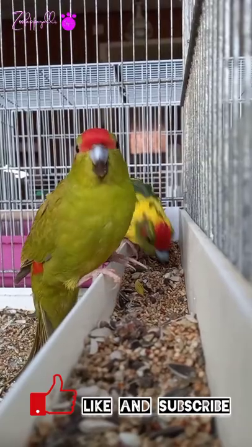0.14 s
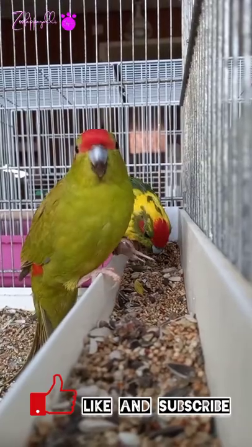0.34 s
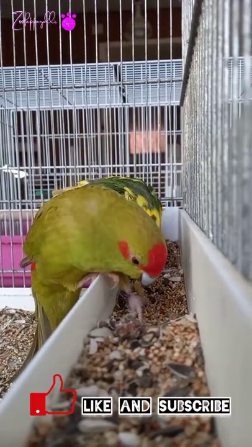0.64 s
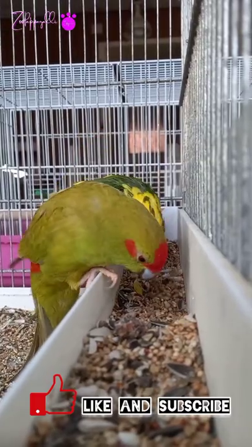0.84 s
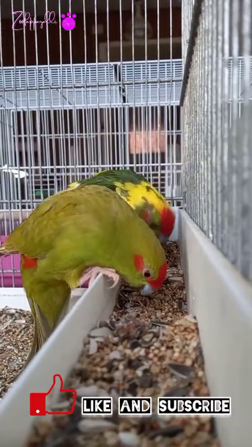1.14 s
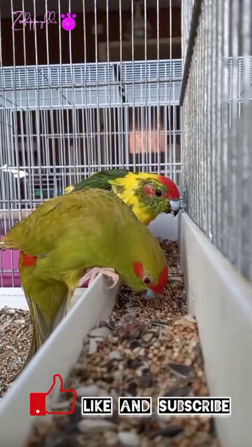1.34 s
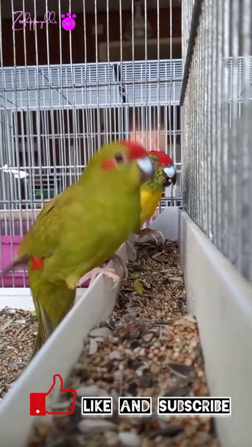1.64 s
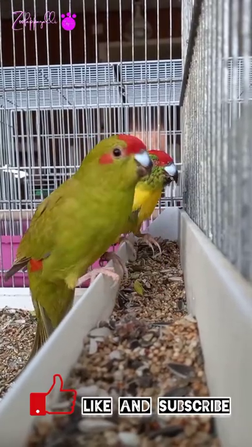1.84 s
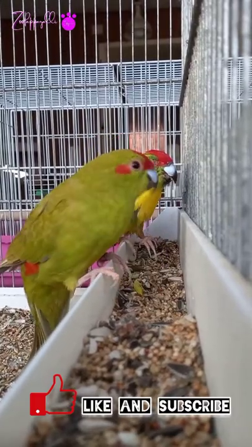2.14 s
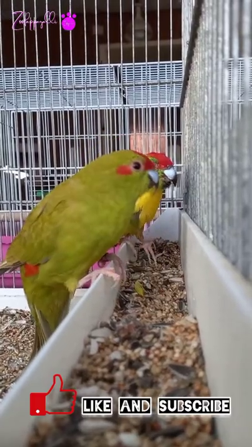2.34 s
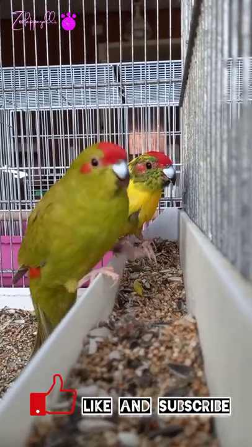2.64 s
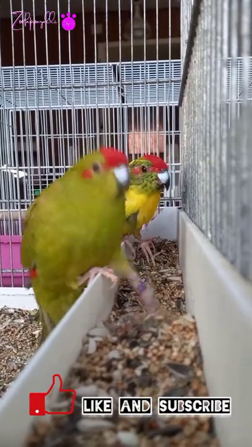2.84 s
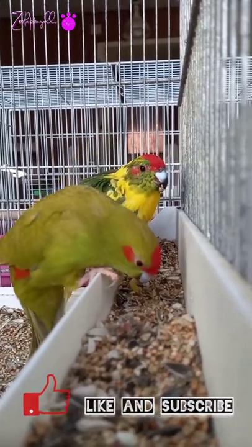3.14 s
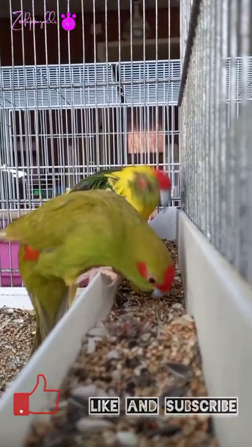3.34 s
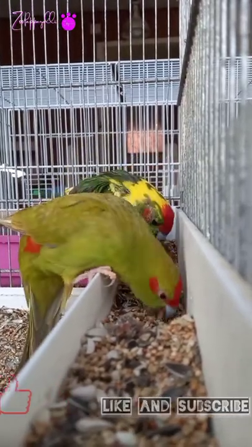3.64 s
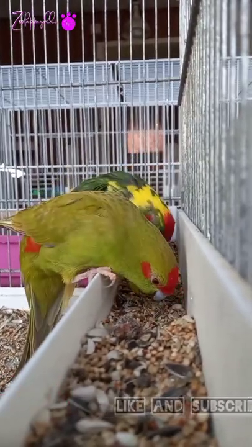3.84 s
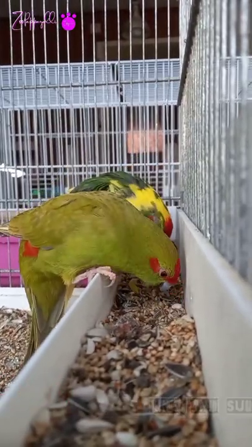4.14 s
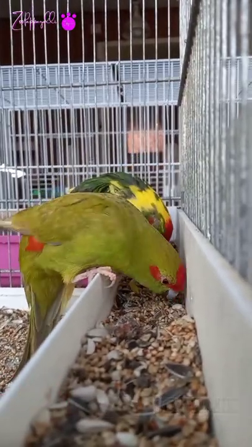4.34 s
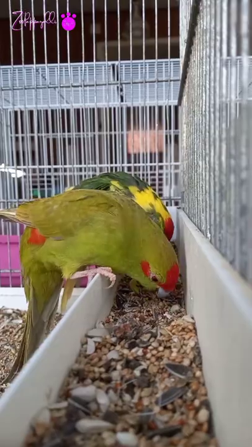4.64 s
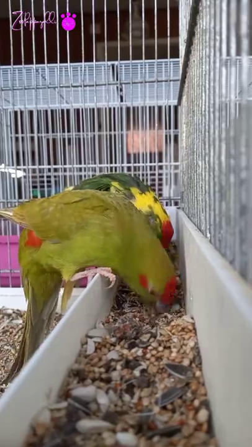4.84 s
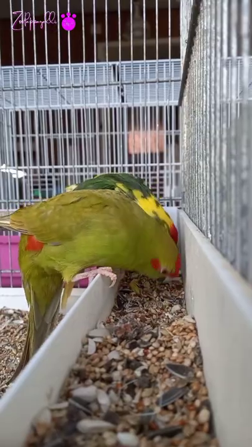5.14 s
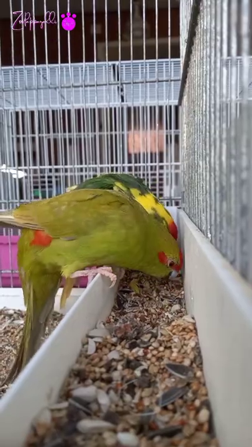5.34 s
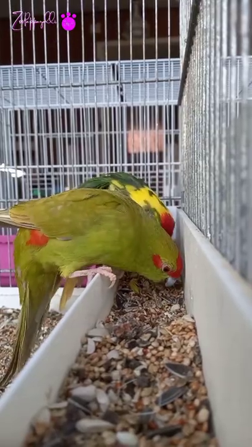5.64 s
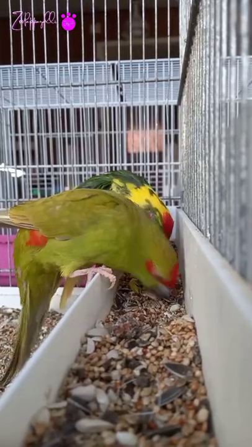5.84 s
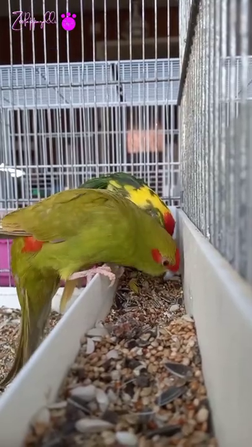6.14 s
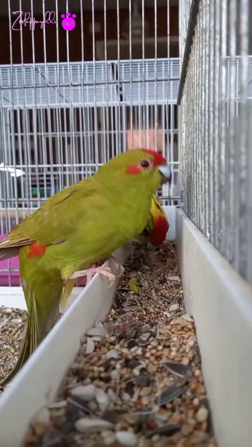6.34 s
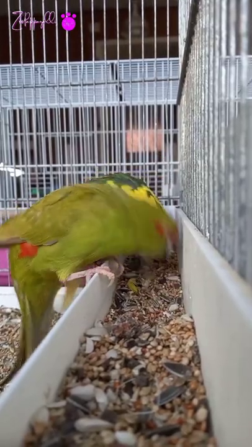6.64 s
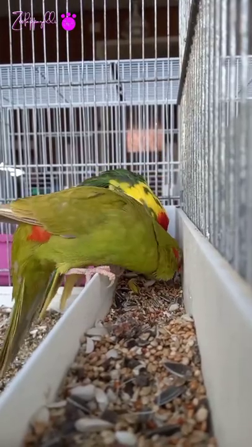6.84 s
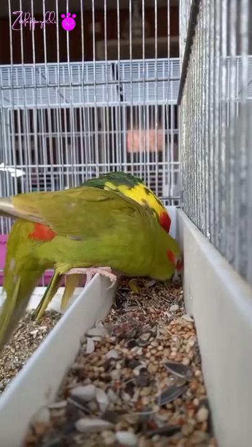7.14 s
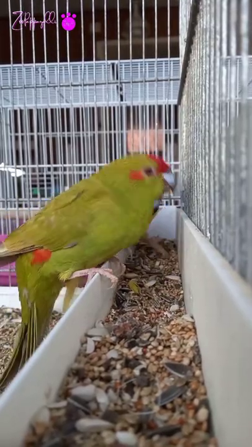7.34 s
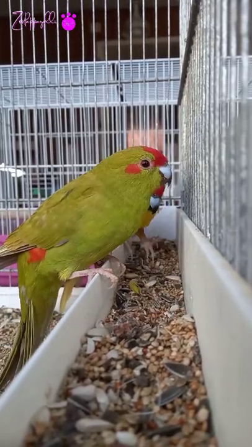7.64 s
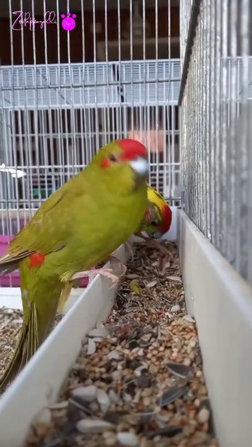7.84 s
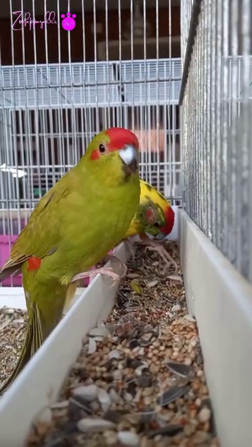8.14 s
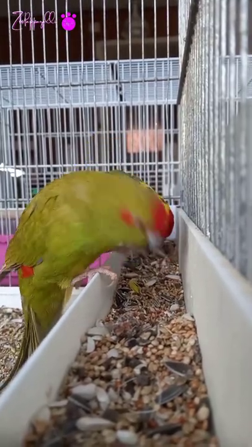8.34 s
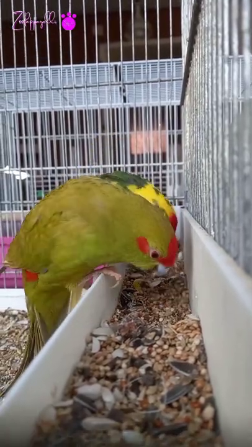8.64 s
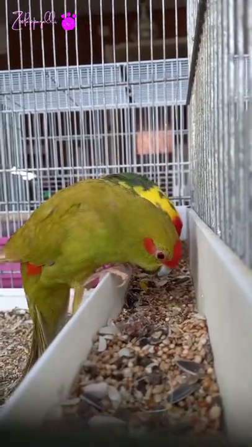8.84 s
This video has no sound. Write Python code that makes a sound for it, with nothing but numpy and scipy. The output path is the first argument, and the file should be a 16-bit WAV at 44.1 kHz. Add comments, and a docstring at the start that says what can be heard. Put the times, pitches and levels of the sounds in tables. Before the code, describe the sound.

Two parakeets feed at a plastic seed tray, heard very close in stereo, over quiet steady air and faint low cage rumble. Light ticks and rustles open, then a cluster of dry husk cracks at 0.7-0.95 seconds and digging, scraping seed at 1.3-1.5. At 1.5 a startlingly loud squawk, about a fifth of a second, swoops up, leaps to a high whistle, drops to a lower note and breaks into rasp, with a dull tray thump and short bright reverberation. After a lull, crisp cracks crowd together at 2.8-3.0. From 3.2 to 6.5 gentle swishes and sparse crackle continue, with tiny peeps near 5.7 and 6.7 and snaps at 6.7. A second, similar squawk bursts out at 7.2 with another thump. The feeding calms from 7.7; a scrape at 8.2, a strong crack at 8.64 and faint peeps close it.

```python
"""Beaks crack husks and stir seed in a plastic tray close by, over a faint cage rumble and steady air.
Two loud squawks leap into a high whistle, drop to a lower register and end in a rasp; a few peeps are soft.
The seed sounds and rumble are filtered noise: sparse grains, snaps with a decaying ring, or steady noise.
The two parakeets' calls are harmonics and pulsed noise shaped by a throat; a small hard-walled aviary rings on."""
import sys
import numpy as np
from scipy import signal
from scipy.fft import rfft, irfft
from scipy.io import wavfile

SR = 44100
rng = np.random.default_rng(int(sys.argv[2]) if len(sys.argv) > 2 else 0)


def master(y):
    """Save y as 16-bit WAV."""
    cut = np.clip(np.atleast_2d(y).T, -1, 1)
    pcm = np.round(cut * 32767)  # scale
    wavfile.write(sys.argv[1], SR, pcm.astype(np.int16))


N = 396900
T = np.arange(N) / SR

# spectrum of a breaking husk: f/Hz, level/dB
HUSK_SPECTRUM = [(300, -41), (800, -22), (1400, -4), (2400, 1), (4000, 0.5), (6400, 9), (7800, -13),
                 (11500, -1.5), (16000, -14.5)]


def undb(db):
    """Level and amplitude: 20 dB is a factor of ten in gain."""
    return 10 ** (np.asarray(db) / 20)


def unit(x):
    """Normalisation of mean power: scale to rms 1."""
    return x / np.sqrt(np.mean(x ** 2) + 1e-20)


def on_log_axis(hz, points):
    """Logarithmic frequency scale: interpolate (f/Hz, value) points, held constant beyond the ends."""
    f, value = np.transpose(points)
    return np.interp(np.log(np.maximum(hz, 1)), np.log(f), value)


def colour(x, spectrum):
    """Minimum-phase filtering by a (f/Hz, level/dB) spectrum: causal, so that attacks stay sharp."""
    n = x.shape[-1]
    gain = undb(on_log_axis(np.fft.rfftfreq(n, 1 / SR), spectrum))
    cepstrum = irfft(np.log(gain), n)
    # folding the cepstrum onto positive time gives the minimum phase
    cepstrum[1:n // 2] *= 2
    cepstrum[n // 2 + 1:] = 0
    return irfft(rfft(x) * np.exp(rfft(cepstrum)), n)


def wander(t, rate):
    """Slow random modulation: normal random levels, rate a second, joined by lines."""
    place = (t - t[0]) * rate
    knots = rng.standard_normal(int(place[-1]) + 2)
    return np.interp(place, np.arange(len(knots)), knots)


def spread(three, shared):
    """Interchannel coherence: two channels from three signals, the first one common to both."""
    shared = np.clip(shared, 0, 1)
    return np.sqrt(shared) * three[0] + np.sqrt(1 - shared) * three[1:]


def add(out, start, x):
    """Superposition: mix x into out at a time in seconds."""
    i = max(int(start * SR), 0)
    out[..., i:i + x.shape[-1]] += x[..., :max(N - i, 0)]


def gestures(rows, rise_db_per_s, fade_db_per_s):
    """Exponential growth and decay with powers summed: gain for rows of t/s, hold/s, level/dB."""
    t, power = T[::64], 0  # a coarse time grid is enough
    for s, hold_s, db in rows:
        before, after = np.maximum(s - t, 0), np.maximum(t - s - hold_s, 0)
        below = rise_db_per_s * before + fade_db_per_s * after
        power = power + undb(db - below) ** 2
    return np.interp(T, t, np.sqrt(power))


def busy():
    """Activity as a slow envelope: gain near 1 while the birds feed, fading when they look up."""
    # bouts with heads down in the tray: t/s, length/s
    bouts = [(0, 1.75), (2.3, 5.44), (8.601, 0.35)]
    return gestures([(s, length_s, 0) for s, length_s in bouts], rise_db_per_s=200, fade_db_per_s=60)


def grains(rate, scatter_db, spectrum):
    """Shot noise: countless tiny contacts of uneven size at random moments, rate a second; rms 1."""
    size = undb(scatter_db * np.minimum(rng.exponential(size=N), 5))
    impacts = size * (rng.random(N) < rate / SR)
    return unit(colour(spread(impacts * rng.standard_normal((3, N)), 0.041), spectrum))


def feeding(bed_crackle_db, bed_swish_db, bed_hiss_db, dig_hiss_db, dig_swish_db, sweep_crackle_db, ticks_db):
    """Granular friction: stirred seeds crackle; husks and feathers swish and hiss; nibbling ticks faintly."""
    # spectra of seed crackle, soft swish and fine hiss: f/Hz, level/dB
    seed_spectrum = [(400, -23), (900, -9), (1700, -3), (2400, 4), (3200, -5), (5000, -4), (6600, -5.5),
                     (7700, -12.5), (11500, -10), (16000, -11)]
    swish_spectrum = [(150, -6), (400, -12), (620, -8.5), (850, 0.5), (1080, 3), (1450, -10.5),
                      (2200, -24.5), (4000, -32.5)]
    hiss_spectrum = [(3000, -21), (5200, -12.5), (6400, 1), (6850, -6), (7400, -21), (9500, -16),
                     (11000, -19), (13000, -12.5), (16000, -16.5)]
    # a beak sweeps loose husks aside: t/s, hold/s, swish level/dB before the swish gain, hiss level/dB
    sweeps = [(0.174, 0.022, -84, -67.5), (0.457, .06, -85, -77), (.735, 0.017, -62, -46.5),
              (0.92, 0.014, -73, -62), (1.079, 0.079, -71, -68.5), (1.29, 0.2, -59, -51.5),
              (2.24, .08, -90, -72.5), (2.47, .04, -68, -67), (2.67, .03, -67, -66),
              (2.87, 0.095, -64, -52), (3.332, .04, -78, -67), (3.48, .14, -83, -73.5),
              (3.69, .07, -72, -72), (3.867, .12, -76.5, -72.5), (4.18, .03, -60.5, -59),
              (4.45, .06, -83.5, -72.5), (4.74, .05, -66, -62), (4.88, 0.019, -64, -65.5),
              (5.091, .04, -59, -57.5), (5.20, .06, -64.5, -66.5), (5.36, .13, -70, -71.5),
              (5.74, 0.019, -72.5, -60), (6.044, .02, -60.5, -57), (6.25, .02, -59.5, -55),
              (6.35, .03, -61.5, -64.5), (6.558, .04, -71.5, -71.5), (6.72, 0.016, -70.5, -55.5),
              (6.909, 0.018, -92, -76), (7.08, .11, -74, -59), (8.191, 0.042, -80, -67.5),
              (8.64, 0.0082, -68.5, -60)]
    # a beak or foot digs into the seed: t/s, hold/s, crackle level/dB
    digs = [(.62, 0.0086, -68), (.726, 0.051, -50), (1.33, .08, -53.5), (1.42, 0.13, -52),
            (2.87, 0.054, -52.5), (3.87, 0.0092, -70), (3.98, 0.0096, -67.5), (5.74, .02, -68),
            (6.72, .02, -72), (7.06, .06, -66.5), (7.18, .02, -54.5), (8.66, 0.027, -57.5),
            (8.80, 0.022, -66.5)]
    s, hold_s, swish_db, hiss_db = np.transpose(sweeps)
    bed = busy()
    dig = gestures(digs, rise_db_per_s=900, fade_db_per_s=170)
    sweep = gestures(zip(s, hold_s, swish_db), rise_db_per_s=323, fade_db_per_s=125.5)
    slide = gestures(zip(s, hold_s, hiss_db), rise_db_per_s=450, fade_db_per_s=160)
    # hypot adds the powers of independent movements
    crackle_gain = np.hypot(dig, bed * undb(bed_crackle_db) + sweep * undb(sweep_crackle_db))
    swish_gain = np.hypot(sweep, dig * undb(dig_swish_db) + bed * undb(bed_swish_db))
    hiss_gain = np.hypot(slide, dig * undb(dig_hiss_db) + bed * undb(bed_hiss_db))
    crackle = grains(7200, 3.0, seed_spectrum) * crackle_gain
    swish = grains(6000, 1.5, swish_spectrum) * undb(2.5) * swish_gain
    hiss = grains(9000, 1.9, hiss_spectrum) * hiss_gain
    ticks = grains(40, 3.0, HUSK_SPECTRUM) * bed * undb(ticks_db)
    return crackle + swish + hiss + ticks


def background(rest_db, feeding_db, air_db):
    """Broadband excitation: the cage rumbles as the birds peck and shift their weight, over steady air."""
    # spectra of the cage rumble and the air: f/Hz, level/dB
    cage_spectrum = [(20, -16), (45, -19.5), (78, 4), (115, -8.5), (200, -15), (400, -17), (800, -26.5),
                     (2000, -50)]
    air_spectrum = [(18, -36.5), (30, -10), (88, 3.5), (152, -7.5), (1020, -23.5), (1820, -21.5),
                    (4540, -32), (6370, -14), (7460, -32), (11900, -27.5), (15500, -36)]
    # a bird shifts its weight and shakes the cage: t/s, hold/s, level/dB
    shoves = [(.12, .05, -58.5), (1.09, 0.045, -60.5), (1.44, 0.12, -47.5), (2.29, .03, -68.5),
              (2.96, .05, -69), (3.48, 0.14, -61.5), (4.71, .07, -59.5), (5.10, 0.041, -62.5),
              (5.35, .04, -60), (6.04, 0.029, -60.5), (6.22, 0.19, -66), (6.87, .04, -61),
              (7.13, .04, -50.5), (7.24, 0.052, -53), (7.81, .03, -68.5), (8.79, .03, -70)]
    rumble = unit(colour(spread(rng.standard_normal((3, N)), .35), cage_spectrum))
    air = unit(colour(spread(rng.standard_normal((3, N)), 0.073), air_spectrum))
    shove = gestures(shoves, rise_db_per_s=249, fade_db_per_s=110.5)
    shaking = np.hypot(shove, undb(rest_db) + busy() * undb(feeding_db))
    return rumble * shaking + air * undb(air_db)


def cracks(swell_s, swell_db, snap_s, crumble_s, crumble_db, ring_db, gain_db):
    """Brittle fracture: a husk snaps in about a millisecond after a faint, quick swell of noise,
    rings briefly and crumbles."""
    # husks cracking and beak taps: t/s, level/dB before gain_db, ring f/Hz, left minus right level/dB,
    # treble level/dB before it is offset and scaled
    events = [(0.0577, -39, 6600, 6, -5), (0.2068, -41, 2390, -8, -29), (0.7195, -16, 4970, -4, -13),
              (0.809, -35, 4870, 9, -7), (0.854, -30, 5300, -7, -11), (0.8691, -34, 2550, 8, -10),
              (0.9018, -27, 4500, -2, 0.5), (0.9278, -34.5, 6460, 5, -6), (2.3433, -46, 6300, 5, -14),
              (2.4159, -43, 6030, -6.5, 3), (2.823, -24.5, 6520, 12, 6.5), (2.8662, -14.5, 6140, -2, -4),
              (2.875, -15, 4730, -1, -7), (2.9323, -15, 6250, 18, -13), (2.9347, -11.5, 6000, -10, -11),
              (2.9578, -16, 4400, 7.5, -15), (2.9926, -13.5, 1840, -1, -6), (3.093, -43, 3047, -5, -16),
              (3.1005, -43, 6510, -4, -3), (3.1607, -46, 4870, 2.5, -13), (3.8642, -41, 2260, 1, -6),
              (5.811, -37.5, 3350, -8, 7), (5.913, -32.5, 6240, -1, -11), (6.246, -37.5, 2460, -10.5, -26),
              (6.7142, -27.5, 2440, -2.5, -5), (6.7555, -31.5, 2464, -5, -5), (7.6324, -31, 3890, 8, -11),
              (8.0483, -44.5, 6490, 9, 10.5), (8.6433, -14.5, 6110, 4, -11.5),
              (8.6644, -30, 6100, -14, -19.5), (8.7884, -39, 5730, 2, -10)]
    out = np.zeros((2, N))
    t = np.arange(-512, 2048) / SR  # 0 at the snap
    after = np.maximum(t, 0)
    for s, db, hz, pan_db, treble_db in events:
        breaking = np.exp(-after / snap_s) + undb(crumble_db) * np.exp(-after / crumble_s)
        swelling = undb(swell_db) * np.exp(-abs(t) / swell_s)
        envelope = np.where(t < 0, swelling, breaking)
        snap = colour(spread(rng.standard_normal((3, len(t))), 0.87) * envelope, HUSK_SPECTRUM)
        ring_phase = 2 * np.pi * hz * t + rng.uniform(0, 2, (2, 1))
        ring = np.sin(ring_phase) * after * np.exp(-after / .0005)
        treble = [(6500, 0.0025), (9000, 0.77 * (treble_db + 13.5))]
        click = colour(unit(snap) + undb(ring_db) * unit(ring), treble)
        channel_db = np.array([[pan_db], [-pan_db]]) / 2
        add(out, s + t[0], unit(click) * undb(db + gain_db + channel_db))
    return out


def scrapes(gain_db):
    """Dense successive impacts: short runs of seeds tumble against the tray, swelling and fading."""
    # a beak or claw dragged through the seed: t/s, length/s, level/dB before gain_db,
    # treble filter level/dB from 10 kHz up (the run is then normalised)
    drags = [(1.261, .13, -50, 16), (1.360, .06, -49, 3.5), (2.400, .09, -63, 24), (3.660, .04, -66, 18),
             (3.835, .05, -58.5, -3), (5.723, .06, -51.5, -6), (6.238, .05, -52.5, -5),
             (6.712, .03, -44.5, -2), (6.765, .03, -51.5, -11.5), (8.159, .12, -60, -2.5),
             (8.542, 0.069, -56, 5.5), (8.592, 0.074, -49, 1.5)]
    # spectrum of tumbling seed: f/Hz, level/dB
    scrape_spectrum = [(600, -21.5), (1300, -11), (2050, -10.5), (2370, 6.5), (2750, -9), (3400, -1),
                       (4300, -6.5), (5700, -5), (6600, -6), (7800, -15.5), (10500, -12), (13200, -13.5),
                       (16000, -18.5)]
    out = np.zeros((2, N))
    tumbling = grains(4000, 3.4, scrape_spectrum)
    for s, length_s, db, treble_db in drags:
        run = tumbling[:, int(s * SR):int((s + length_s) * SR)]
        run = unit(colour(run, [(6500, 0.011), (10000, treble_db)]))
        add(out, s, run * signal.windows.tukey(run.shape[1], .6) * undb(db + gain_db))
    return out


def squawk(start, leap, drop, rasp, end, whistle_hz, last_hz, low_hz, db):
    """Register jumps of a driven oscillator: rows of t/s, f/Hz, level/dB, roughness through one squawk."""
    # pitch shares: swoop up to the low register, sag of the pushed whistle, droop and collapse of the low register
    swoop_share, sag_share, droop_share, collapse_share = .31, .06, .04, .43
    sag_after_s, sag_s, attack_s, release_s = .021, .012, .027, 0.015
    # level/dB re the start of the whistle
    swoop_db, push_db, low_register_db, rasp_db = -11, 3, -5.5, -5
    # roughness of each stage, 0 to 1
    rough_onset, rough_swoop, rough_whistle, rough_pushed, rough_low, rough_rasp = .92, .35, .08, .22, .08, .75

    t = np.arange(start, end, 1 / SR)

    def through(a, b):
        """Linear progress from 0 at time a to 1 at time b."""
        return np.clip((t - a) / (b - a), 0, 1)

    pushed = leap + sag_after_s
    sagged = pushed + sag_s
    swoop = np.sin(np.pi / 2 * through(start, leap) ** 2) ** 2
    droop = droop_share * through(drop, rasp) ** 4
    collapse = collapse_share * through(rasp, end)
    low = low_hz * (1 - swoop_share * (1 - swoop) - droop - collapse)
    whistle = np.interp(t, [pushed, sagged, drop], [whistle_hz, whistle_hz * (1 - sag_share), last_hz])
    hz = np.where((t > leap) & (t < drop), whistle, low)
    effort_db = np.interp(t, [start, leap, sagged, drop, rasp, end],
                          [swoop_db, 0, push_db, low_register_db, rasp_db, rasp_db])
    gate = through(start, start + attack_s) * (1 - through(end - release_s, end))
    swooping = rough_onset + (rough_swoop - rough_onset) * swoop
    whistling = np.interp(t, [leap, drop], [rough_whistle, rough_pushed])
    falling = np.interp(t, [rasp, (rasp + end) / 2], [rough_low, rough_rasp])
    rough = np.select([t < leap, t < drop], [swooping, whistling], falling)
    return np.c_[t, hz, db + effort_db + 20 * np.log10(gate + 1e-6), rough]


def call(rows, throat, jitter, flutter, rasp_db, slope_db):
    """Source and filter: the syrinx buzzes through the throat; roughness shakes it and adds a pulsing rasp."""
    s, *columns = np.transpose(rows)
    t = np.arange(s[0], s[-1], 1 / SR)
    hz, db, rough = (np.interp(t, s, c) for c in columns)
    rough = np.clip(rough, 0, 1)
    waver = .004 * wander(t, 220) + (0.0027 + jitter * rough) * wander(t, 700)
    phase = 2 * np.pi * np.cumsum(hz * (1 + waver)) / SR
    tone, power = 0, 0
    for k in np.arange(8) + 1:  # harmonics, slope_db per octave
        size = undb(on_log_axis(k * hz, throat) + slope_db * np.log2(k))
        size = size * (k * hz < SR / 2)
        tone = tone + size * np.sin(k * phase)
        power = power + size ** 2 / 2
    tone = tone / np.sqrt(power) * (1 + flutter * rough * wander(t, 700))
    pulsed_noise = rng.standard_normal(len(t)) * (1 + np.cos(phase))
    rasp = unit(colour(pulsed_noise, throat))
    voice = tone * np.sqrt(1 - rough ** 2) + undb(rasp_db) * rough ** 2 * rasp
    return voice * undb(db) * signal.windows.tukey(len(t), .04)


def voices():
    """Radiation from a small source: squawks and peeps on one track, weaker in the bass."""
    # squawks: start t/s, leap to the whistle t/s, drop to the low register t/s, rasp from t/s, end t/s,
    # whistle's first f/Hz, whistle's last f/Hz, low register f/Hz, reference level/dB at the leap
    squawk_rows = [(1.502, 1.531, 1.604, 1.653, 1.7125, 3803, 3522, 2570, -10.5),
                   (7.209, 7.240, 7.303, 7.364, 7.416, 3979, 3800, 2755, -10)]
    # soft peeps: t/s, length/s, first f/Hz, last f/Hz, reference level/dB at the peak
    peep_rows = [(5.693, 0.027, 3330, 3270, -49), (6.660, .032, 3120, 3480, -55),
                 (6.772, 0.032, 4370, 4940, -58.5), (8.165, 0.026, 5680, 5800, -65),
                 (8.749, .065, 2833, 2987, -55.5), (8.882, .053, 2330, 2290, -66)]
    # response of windpipe and open beak: f/Hz, level/dB
    open_throat = [(1100, -34), (1900, -19), (2600, -14), (3050, -13), (3600, 0.5), (5300, 1.5), (6300, -6),
                   (7600, -17), (8800, -14), (11300, -8.5), (13200, -17), (14800, -9), (17000, -14.5)]
    # response of the throat with the beak nearly shut: f/Hz, level/dB
    shut_beak = [(1200, -16.5), (2300, 2), (3400, 1), (4600, -14.5), (5800, 14), (6500, -14), (9000, -27)]
    out = np.zeros(N)
    for row in squawk_rows:
        course = squawk(*row)
        add(out, row[0], call(course, open_throat, jitter=.07, flutter=.6, rasp_db=1.5, slope_db=-6.5))
    for row in peep_rows:
        course = peep(*row)
        add(out, row[0], call(course, shut_beak, jitter=.07, flutter=.5, rasp_db=-1, slope_db=0.0))
    return colour(out, [(600, -6.5), (1500, 0)])


def room(x, delay_s, early, early_s):
    """Reverberation: early reflections from tray and walls, then a dense tail, different at each ear."""
    # reverberation time of the aviary: f/Hz, T60/s
    reverberation = [(500, 0.24), (2500, 0.51), (4500, 0.48), (8000, 0.35), (12000, 0.21), (16000, 0.067)]
    t = np.arange(SR) / SR
    hz = np.fft.rfftfreq(SR, 1 / SR)
    noise, tail = rfft(rng.standard_normal((2, SR))), 0
    centres, t60s = np.transpose(reverberation)
    # overlapping bands of noise, each falling 60 dB in its own T60
    for band, t60 in zip(np.eye(len(centres)), t60s):
        band_noise = irfft(noise * on_log_axis(hz, np.c_[centres, band]))
        tail = tail + band_noise * np.exp(-np.log(1000) * t / t60)
    onset = np.clip(t / delay_s - 1, 0, 1)
    tail = tail * onset * (1 + early * np.exp(-t / early_s))
    return signal.fftconvolve(np.atleast_2d(x), unit(tail) / np.sqrt(SR), axes=1)[:, :N]


def jolts():
    """Structure-borne impact: feet and wings knock the plastic tray, a dull, swelling thump."""
    # the tray thumps as a bird starts up to squawk: t/s, length/s, level/dB before the swell window
    knocks = [(1.514, 0.12, -44), (7.221, 0.07, -37)]
    # spectrum of the tray: f/Hz, level/dB
    tray_spectrum = [(20, 2), (50, 2), (100, -8.5), (250, -8), (600, -8), (1100, -7), (2000, -25.5)]
    out = np.zeros((2, N))
    for s, length_s, db in knocks:
        thump = unit(colour(spread(rng.standard_normal((3, SR // 4)), 0.35), tray_spectrum))
        thump = thump[:, :int(length_s * SR)]
        add(out, s, thump * signal.windows.tukey(thump.shape[1], .8) * undb(db))
    return out


def peep(start, length_s, first_hz, last_hz, db):
    """Frequency glide: rows of t/s, f/Hz, level/dB, roughness for one short peep that swells and fades."""
    peak_share, edge_db, roughness = .38, -15.5, 0.16  # edge_db: level of the ends re the peak
    share = np.array([0, peak_share, 1])
    hz = first_hz + (last_hz - first_hz) * np.sqrt(share)
    level_db = db + edge_db * np.array([1, 0, 1])
    return np.c_[start + length_s * share, hz, level_db, roughness * np.ones(len(share))]


def scene():
    """Direct and reverberant fields: the calls fill the room; cracks and scrapes are near and much drier."""
    stirring = feeding(bed_crackle_db=-81.0, bed_swish_db=-84.5, bed_hiss_db=-82, dig_hiss_db=-2,
                       dig_swish_db=-18, sweep_crackle_db=-22, ticks_db=-82.5)
    cage_and_air = background(rest_db=-82, feeding_db=-72, air_db=-74.0)
    seeds = cracks(swell_s=0.0014, swell_db=-15.5, snap_s=.0012, crumble_s=.004, crumble_db=-12.0,
                   ring_db=-4, gain_db=-27.5)
    seeds = seeds + scrapes(gain_db=-0.5)
    # the tray walls shade the low part of what reaches the room
    escaping = colour(seeds, [(1600, -13), (2400, -8.5), (6000, -14.0), (10000, -5.5)])
    near = seeds + room(escaping, delay_s=.002, early=0.63, early_s=0.013)
    voice = voices()
    direct = np.array([np.roll(voice, 5), voice])  # left lags by 5 samples
    reverberant = room(voice, delay_s=0.00034, early=0.82, early_s=0.0055)
    birds = undb(-2.5) * direct + undb(2) * reverberant
    return birds + near + jolts() + stirring + cage_and_air


def record(dry):
    """Overload and band limiting: the microphone clips the loudest peaks and cuts the top."""
    top_hz = 15900
    low_pass = signal.ellip(12, .2, 70, top_hz, fs=SR, output="sos")  # ripple .2 dB, stopband 70 dB down
    return signal.sosfilt(low_pass, np.clip(dry, -1, 1))


dry = scene()
out = record(dry)
master(out)
```